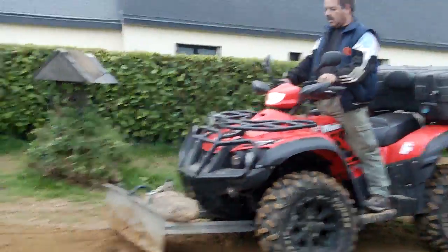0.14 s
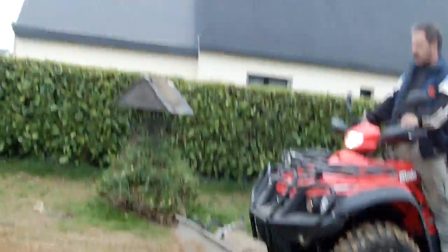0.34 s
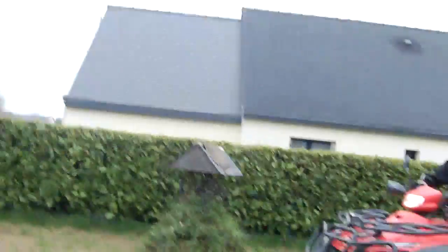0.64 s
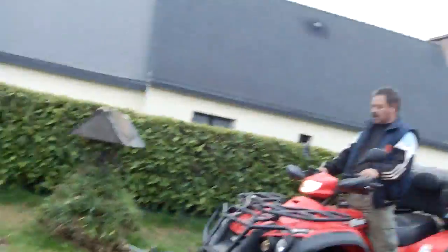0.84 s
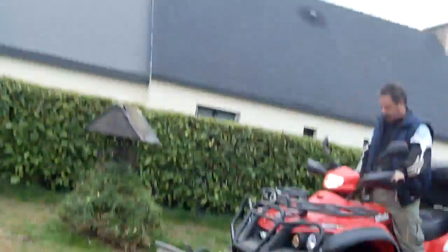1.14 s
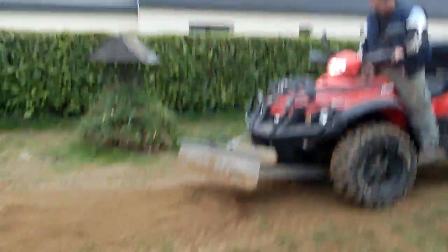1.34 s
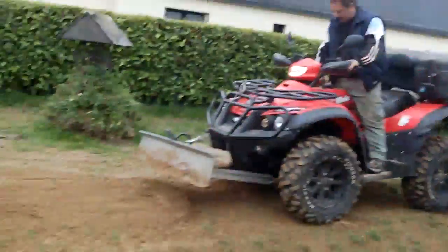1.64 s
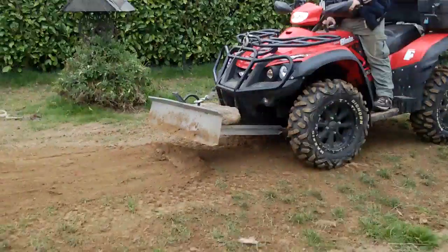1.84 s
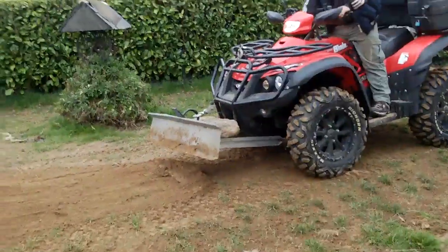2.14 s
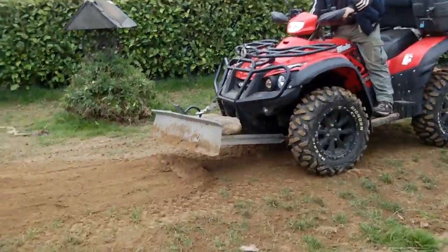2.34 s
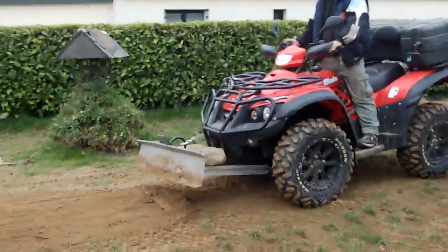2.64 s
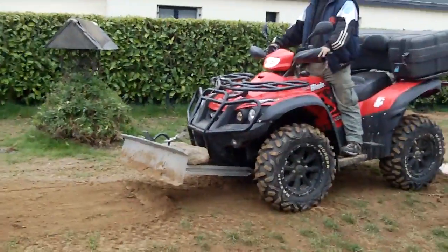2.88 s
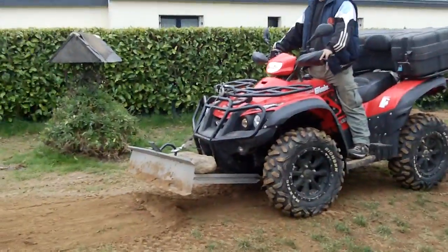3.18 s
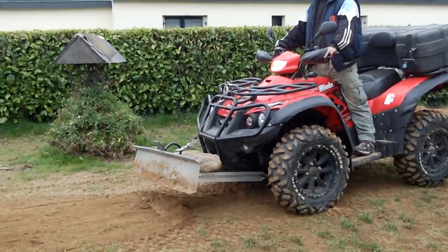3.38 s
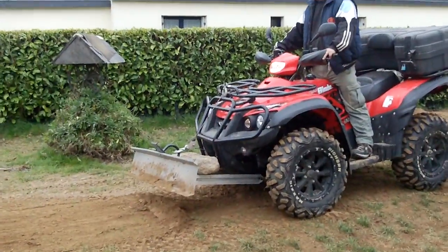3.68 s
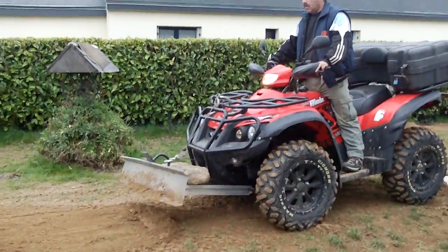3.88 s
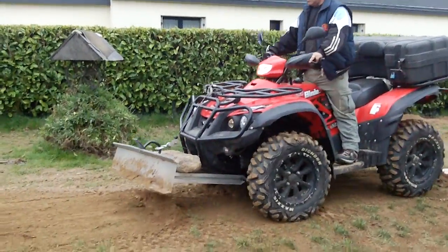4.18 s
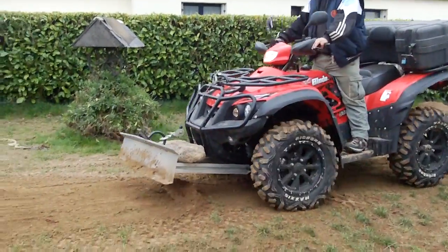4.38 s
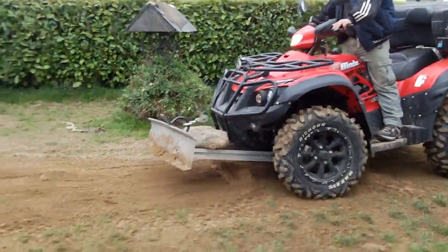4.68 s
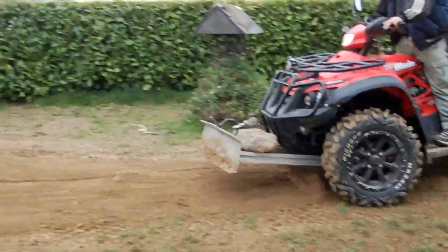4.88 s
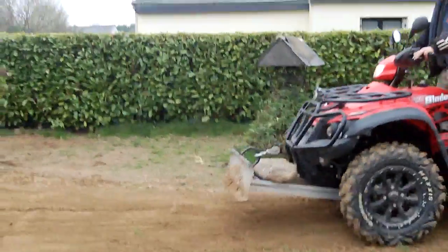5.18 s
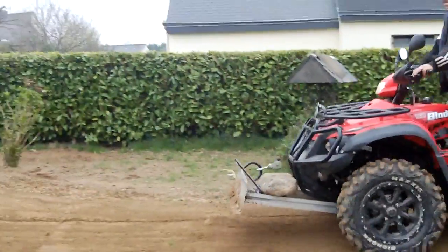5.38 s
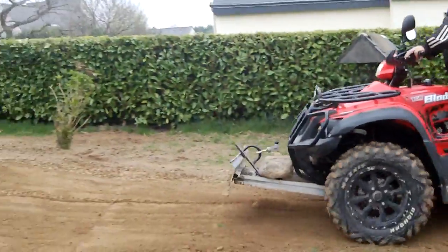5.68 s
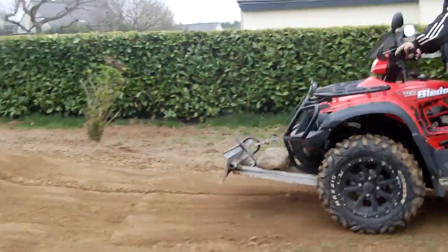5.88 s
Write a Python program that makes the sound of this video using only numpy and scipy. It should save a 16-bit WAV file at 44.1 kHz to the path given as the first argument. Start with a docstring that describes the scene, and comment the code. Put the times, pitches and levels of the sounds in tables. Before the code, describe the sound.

Outdoors, a single-cylinder quad engine putters at idle, briefly joined by a grainy hiss, then quickens into a throaty hum as it moves off. Very close handling noise keeps cutting in: dull thumps on the microphone and sharp knocks on its plastic casing, loudest near the middle and toward the end. A dull drone and an uneven low rumble lie behind.

```python
"""A single-cylinder quad chugs at idle in a garden, then pulls away; each firing rings silencer and pipe.
The microphone sits in a small handheld camera, so the handling is as close as can be:
pushes thump the microphone and knocks ring the plastic shell, clipping the input.
Engine clatter and a brighter hiss at the start come through the shell's treble resonances.
Behind them lie a dull drone, a low rumble and a thin whine."""
import sys
import numpy as np
from scipy import signal
from scipy.fft import rfft, irfft, next_fast_len
from scipy.io import wavfile
from scipy.ndimage import map_coordinates

SR = 44100
rng = np.random.default_rng(int(sys.argv[2]) if len(sys.argv) > 2 else 0)


def output_pcm(signal):
    """Save a mono or channel-first signal as 16-bit PCM at the path in sys.argv[1].

    Samples are clipped to [-1, 1] before scaling.
    """
    pcm = np.clip(np.atleast_2d(signal).T, -1, 1) * 32767
    wavfile.write(sys.argv[1], SR, np.round(pcm).astype(np.int16))


N = 265482

# engine speed: t/s, firing rate/Hz
FIRING_RATE = [(0.0, 12.277), (0.52, 12.084), (1.04, 12.56), (1.26, 12.38), (2.48, 13.745), (2.62, 12.483),
               (3.0, 13.735), (3.2, 12.384), (3.32, 16.587), (3.84, 20.691), (4.04, 24.347), (4.22, 21.954),
               (4.38, 23.051), (4.52, 19.741), (4.82, 19.842), (5.1, 23.644), (5.18, 22.737),
               (6.02, 25.413)]
# strength of a firing: t/s, silencer level/dB, tail pipe level/dB
FIRING_LEVELS = [(0.0, -14.5, -16.5), (0.5, -16, -17), (1.3, -16, -16), (2.0, -18, -15), (2.6, -16, -16.5),
                 (3.12, -23, -17.5), (3.38, -18, -13), (3.62, -12, -12.5), (3.98, -21.5, -13),
                 (4.3, -20, -11.5), (4.56, -18, -15), (4.72, -16.5, -14), (4.94, -13, -8.5),
                 (5.1, -15.5, -9.5), (5.3, -12.5, -11), (5.45, -40, -7), (5.7, -22, -7.5),
                 (5.88, -11.5, -8.5), (6.02, -17, -7)]
# exhaust modes: f/Hz, level/dB, t60/s
SILENCER_MODES = [(113, 3.5, 0.13)]
CHAMBER_MODES = [(60, -30, 0.081), (78, 4.5, 0.058)]
OUTLET_MODES = [(189.4, -10.5, 0.16), (222, -9, 0.053)]
PIPE_MODES = [(145.2, 0.5, 0.2)]
PIPE_SPEED_MODES = [(150.6, -13, 0.3), (271, -9, 0.077), (285, -24.5, 0.031)]
# pushes on the microphone: t/s, signed pressure/relative, rise/ms, swing f/Hz, t60/s
MIC_PUSHES = [(.385, 0.3, 5.9, 30, 0.088), (.692, 0.48, 6, 48, .08), (1.512, 0.07, 6, 33, 0.11),
              (1.595, 0.6, 3, 37, 0.066), (1.662, 0.4, 7.5, 21, 0.12), (1.721, -0.4, 2, 58, 0.06),
              (1.756, -0.4, 4.4, 36, 0.037), (1.868, 0.3, 7, 25, 0.067), (1.909, 0.35, 5, 19, 0.077),
              (1.998, 1.07, 4, 19.3, 0.13), (2.016, -.53, 5.1, 29, .071), (2.408, -1.25, 2.9, 56, 0.063),
              (2.418, 0.8, 3.6, 37.4, 0.32), (2.489, 0.35, 5, 44, .081), (2.678, 0.54, 8.5, 9.6, 0.22),
              (2.761, 1.58, 3.1, 62, .043), (2.767, -.95, 1, 11, 0.13), (2.947, 1.2, 1.4, 67, 0.025),
              (2.972, 0.3, 2.8, 26, 0.059), (3.236, -1.9, 1.84, 68, 0.011), (3.247, 0.37, 5, 14.6, .35),
              (3.458, 0.45, 8, 13, 0.091), (3.856, 1.09, 2.1, 17.4, .22), (3.909, 1.5, 1, 72, 0.026),
              (4.704, -2.3, 2.5, 94, 0.025), (4.712, 0.97, 2.6, 16, .13), (4.743, 0.85, 3.5, 16, 0.077),
              (4.823, 1.36, 2.3, 66, 0.062), (4.846, 0.46, 3.8, 19, .088), (5.72, -1.1, 8, 28, 0.052),
              (5.738, 0.75, 5.7, 10, .13), (5.939, 1.4, 9.8, 43, 0.055)]
# knocks on the camera: t/s, level/dB, tilt/dB per octave, ring length/ratio, favoured f/Hz
SHELL_KNOCKS = [(0.54, -29, 0, 1.24, 638), (0.736, -37, 9, .85, 1300), (1.02, -22, 2, 0.56, 605),
                (1.526, -34, 5, .7, 509), (1.599, -12.5, 5, 0.69, 947), (1.703, -23, -2, 0.62, 487),
                (1.905, -23.5, 0, 0.46, 690), (1.948, -21.5, -0.5, 0.76, 607), (1.985, -34, -4, .8, 460),
                (2.059, -35, 1, 1.25, 1300), (2.409, -17, 1, 1.07, 440), (2.479, -17, -0.5, 0.64, 1280),
                (2.761, .6, 1.5, 0.71, 870), (2.849, -29, -3.5, 1.06, 420), (2.945, -1.5, 0.5, 0.28, 1100),
                (2.967, -27.5, -2, 0.49, 500), (3.234, -28, -3, 0.81, 455), (3.47, -28.5, -5, .6, 804),
                (3.789, -32, -3, .45, 500), (3.851, -26, -5, .45, 452), (3.909, -5, 3.5, 0.34, 1270),
                (4.7, -27, -3, 0.63, 500), (4.737, -20, -4, 0.51, 821), (4.797, -32, -1, 1.2, 805),
                (4.823, 3.5, 2, 0.66, 594), (4.969, -34, 0, .45, 800), (5.073, -25.5, -1, .7, 786),
                (5.109, -28.5, -4.5, 1.5, 890), (5.523, -28, 3, 1.5, 810), (5.553, -26, 2, .8, 800),
                (5.716, -25.5, -1.5, 1.1, 746), (5.812, -19, -3, 1.06, 774), (5.834, -28.5, -2, 1.15, 756),
                (5.915, -22, -3, 1, 480), (5.925, -20, 0, 1.1, 750), (5.936, 3.6, 6.5, 0.38, 960)]
# modes of the plastic shell: f/Hz, level/dB, t60/s
SHELL_MODES = [(189.4, 1.5, 0.12), (322, -36, 0.0078), (397, -11, 0.15), (469, -2.5, 0.039),
               (561, 0.5, 0.033), (736, 1, 0.031), (931, -2, 0.042), (1277, 0.5, 0.044),
               (1650, -19.5, 0.042), (2325, -28, .015)]
# finger strokes on the shell: t/s, length/s, level/dB
FINGER_RUBS = [(.22, 0.065, -33.5), (.5, 0.19, -26), (1.711, 0.11, -28), (2.821, 0.086, -24.5),
               (5.512, 0.1, -21), (5.691, .07, -22), (5.827, 0.053, -17.5), (5.898, 0.075, -16)]
# ticks of grit: t/s, level/dB
GRIT_TICKS = [(0.2399, -10), (0.6, -12), (1.948, -29), (1.985, -28), (2.0644, -22), (2.9262, -18),
              (3.5648, -15), (5.0597, -14.5), (5.8095, -8), (5.8316, -11), (5.909, -14), (5.923, -10)]
# loudness of the noise layers: t/s, level/dB
CLATTER_LEVEL = [(0.68, -38), (1.7, -37.5), (2.05, -34.5), (2.25, -37), (2.9, -36), (3.15, -37.5),
                 (3.58, -33), (3.8, -34.5), (4.1, -31.5), (4.45, -31.5), (4.88, -34.5), (5.13, -31.5),
                 (5.45, -30.5), (6.02, -31)]
HISS_LEVEL = [(0, -27), (.25, -28), (.61, -26.5), (.63, -43), (.7, -90)]
RUMBLE_LEVEL = [(0, -23), (0.7, -22.5), (1.3, -25), (1.85, -16.5), (2.25, -26.5), (2.6, -20.5),
                (3.3, -20.5), (3.6, -40), (3.9, -19), (4.2, -36), (4.95, -20.5), (5.3, -21.5), (5.6, -43),
                (6.02, -16.5)]
# colour of the noise layers: f/Hz, relative level/dB
CLATTER_SPECTRUM = [(1120, -46), (1900, -15.5), (2440, -11), (2620, -5), (3050, 1), (3330, -4.5),
                    (4050, -10), (4470, -10.5), (5490, -14.5), (6920, -8), (7770, -15.5), (8620, -25),
                    (9130, -19), (12800, -34.5), (16000, -38)]
HISS_SPECTRUM = [(1180, -54), (2000, -20), (3200, 1), (3520, -4), (3810, -5), (4340, -9.5), (5030, -12.5),
                 (5440, -6.5), (6940, 1), (8550, -17.5), (9330, -11), (11500, -25), (12700, -33),
                 (15100, -33), (16000, -38)]
DRONE_SPECTRUM = [(180, -36), (300, 3), (371, -11), (411, -8), (564, -4.5), (668, -7.5), (908, -3.5),
                  (1010, -11.5), (1220, -7.5), (1480, -11.5), (2300, -18), (2990, -49), (5060, -120)]
RUMBLE_SPECTRUM = [(6, -51), (14, 18.5), (30, -4), (60, 0), (200, -13.5), (400, -63)]
GAS_SPECTRUM = [(90, -30), (170, 0), (230, -6), (330, -24), (500, -40)]
MIC_SPECTRUM = [(5000, -17), (12000, 1), (16000, 0), (17000, -10)]
# clatter bands that flutter separately: low f/Hz, high f/Hz
FLUTTER_BANDS = [(0, 4200), (4200, 8500), (8500, 12000), (12000, 20000)]


def exhaust(rate, cycles):
    """One firing per four-stroke cycle rings silencer and pipe; the unbalanced crank shakes twice."""
    firings = np.diff(np.floor(cycles), prepend=0) * amp(0.24 * wobble(13))
    silencer_db, pipe_db = curves(FIRING_LEVELS)
    silencer_pulses, pipe_pulses = firings * amp(silencer_db), firings * amp(pipe_db)
    t = np.arange(SR // 2) / SR
    # the silencer first sucks in, its outlet and the pipe push out
    chug = -excite(silencer_pulses, ring(SILENCER_MODES, t, 0.00052))
    # a short swell of pressure runs ahead of each firing
    lead = round(0.0068 * SR)
    chug += np.convolve(silencer_pulses * amp(-8), np.hanning(lead))[lead - 1:]
    # the big chamber and the outlet speak mostly at idle
    idle_pulses = silencer_pulses * amp(-.6 * np.clip(rate - 17, 0, 9))
    chug += excite(idle_pulses, ring(OUTLET_MODES, t, 0.0006) - ring(CHAMBER_MODES, t, 0.00032))
    boom = excite(pipe_pulses, ring(PIPE_MODES, t, 0.00065))
    # at speed the pipe rings longer and its overtones build up
    hum = excite(pipe_pulses * np.clip(rate / 21, 0, 1) ** 3.1, ring(PIPE_SPEED_MODES, t, 0.003))
    shake = amp(pipe_db - 15) * (rate / 23) ** 2 * np.cos(4 * np.pi * cycles)
    # turbulent gas puffs out after each firing
    puffs = excite(pipe_pulses, t / 0.0033 * np.exp(-t / 0.0084))
    gas = amp(-24) * puffs * coloured(GAS_SPECTRUM, noise())
    # the silencer swallows everything above its chambers' range
    return filtered(chug + boom + hum + shake + gas, lambda hz: 1 / (1 + (hz / 330) ** 8))


def clatter(cycles):
    """Valve gear and cooling air: fluttering noise with four tappet strikes and one swell per cycle."""
    air = np.zeros(N)
    for low, high in FLUTTER_BANDS:
        flutter = amp(.4 * wobble(9) + .7 * wobble(45))
        air += flutter * filtered(grainy_noise(1.1), lambda hz: (hz >= low) & (hz < high))
    level_db, = curves(CLATTER_LEVEL)
    tappets_db = .5 * np.cos(8 * np.pi * cycles)
    throb_db = .67 * np.cos(2 * np.pi * cycles - .7)
    return amp(level_db + tappets_db + throb_db) * coloured(CLATTER_SPECTRUM, air)


def pushes():
    """Pressure right on the microphone builds to a cusp, then swings back and dies."""
    t, thumps = np.arange(N) / SR, np.zeros(N)
    for at, pressure, rise_ms, swing_hz, t60 in MIC_PUSHES:
        rise = rise_ms / 1000
        near = slice(max(round((at - 8 * rise) * SR), 0), round((at + t60) * SR))
        age = t[near] - at
        swing = amp(-60 * age / t60) * np.cos(2 * np.pi * swing_hz * age)
        thumps[near] += pressure * np.where(age < 0, np.exp(age / rise), swing)
    return filtered(thumps, lambda hz: 1 / (1 + (hz / 260) ** 2))


def knocks():
    """Each knock rings the shell around the microphone, with a short crack and a dull scuff."""
    rings, scuffs, cracks = np.zeros((3, N))
    t = np.arange(SR // 5) / SR
    for at, db, tilt_db, ring_length, spot_hz in SHELL_KNOCKS:
        modes = []
        for hz, mode_db, t60 in SHELL_MODES:
            detune, scatter_db = noise(2) * [.015, 2]
            # where the knock lands favours the modes near one pitch
            spot_db = 7 * np.exp(-(np.log(hz / spot_hz) / 0.2) ** 2)
            mode_db += tilt_db * np.log2(hz / 800) + scatter_db + spot_db
            modes.append((hz * (1 + detune), mode_db, t60 * ring_length))
        rattle = 1 + 0.17 * noise(len(t))
        crack_db = 1.35 * db - 7.5  # hard blows crack far more than soft ones
        add(cracks, at + 0.00093, amp(crack_db - 60 * t / 0.0065) * noise(len(t)))
        add(rings, at + 0.00042, amp(db - 2.5) * ring(modes, t, 0.00059) * rattle)
        add(scuffs, at + .0005, amp(db + 5 - 60 * t / (.025 * ring_length)) * noise(len(t)))
    rings = filtered(rings, lambda hz: 1 / (1 + 1j * hz / 1900) ** 3)
    cracks = filtered(cracks, lambda hz: 1 / (1 + 1j * hz / 4000))
    return rings + cracks + filtered(scuffs, scuff_response)


def rubs():
    """Fingers rub the shell in short swells of dull noise."""
    strokes = np.zeros(N)
    for at, length, db in FINGER_RUBS:
        swell = np.hanning(round(length * SR))
        add(strokes, at, amp(db) * swell * noise(len(swell)))
    return filtered(strokes, scuff_response)


def ticks():
    """Grit ticks: tiny noise bursts through two treble resonances."""
    t, bursts = np.arange(SR // 5) / SR, np.zeros(N)
    for at, db in GRIT_TICKS:
        add(bursts, at, amp(db - 60 * t / 0.015) * (1 - np.exp(-t / 0.0009)) * noise(len(t)))
    return 1.68 * filtered(bursts, lambda hz: resonance(hz, 6700, 2600) ** 2 - .7 * resonance(hz, 3050, 700))


def hiss():
    """A bright, grainy hiss that drops away within the first second."""
    level_db, = curves(HISS_LEVEL)
    return amp(level_db + wobble(29.3)) * coloured(HISS_SPECTRUM, grainy_noise(1.1))


def drone(rate, idle_hz=12.5):
    """A dull midrange noise that grows with engine speed."""
    level_db = -45.5 + .5 * (rate - idle_hz)
    return amp(level_db + 1.3 * wobble(12)) * coloured(DRONE_SPECTRUM, grainy_noise(0.87))


def rumble():
    """Deep noise heaves unevenly under everything."""
    level_db, = curves(RUMBLE_LEVEL)
    return amp(level_db + 2.5 * wobble(6.3)) * coloured(RUMBLE_SPECTRUM, noise())


def noise_floor(whine_hz=11988):
    """A thin, nearly steady whine and the microphone's own noise."""
    phase = 2 * np.pi * np.cumsum(whine_hz + 4 * wobble(22.7)) / SR
    return np.sqrt(2) * amp(-73) * np.sin(phase) + amp(-64) * coloured(MIC_SPECTRUM, noise())


def amp(db):
    return 10 ** (np.asarray(db) / 20)


def curves(rows):
    """One value per sample for each column after the time."""
    times, *columns = np.transpose(rows)
    return [np.interp(np.arange(N) / SR, times, column) for column in columns]


def noise(count=N):
    return rng.standard_normal(count)


def wobble(rate):
    """A smooth random curve, rate knots a second."""
    return map_coordinates(noise(int(N * rate / SR) + 4), [np.arange(N) * rate / SR])


def grainy_noise(spread_db):
    """Noise whose level flickers fast."""
    return noise() * amp(spread_db * wobble(400))


def filtered(x, response):
    """x through a frequency response."""
    size = next_fast_len(N + SR // 2)
    return irfft(rfft(x, size) * response(np.fft.rfftfreq(size, 1 / SR)), size)[..., :N]


def coloured(spectrum, source):
    """The source shaped by a spectrum table, rms 1."""
    points_hz, db = np.transpose(spectrum)
    x = filtered(source, lambda hz: amp(np.interp(np.log(hz + 1), np.log(points_hz), db, -120, -120)))
    return x / np.std(x)


def resonance(hz, centre_hz, width_hz):
    """Band-pass response of one mode."""
    return 1j * hz * width_hz / (centre_hz ** 2 - hz ** 2 + 1j * hz * width_hz)


def scuff_response(hz):
    """The broad, dull band of a scuff on the shell."""
    return resonance(hz, 650, 1300) ** 2 / (1 + (hz / 1600) ** 6)


def ring(modes, t, attack_s):
    """Damped sines with a soft start."""
    sines = sum(amp(db - 60 * t / t60) * np.sin(2 * np.pi * hz * t) for hz, db, t60 in modes)
    return (1 - np.exp(-t / attack_s)) * sines


def excite(pulses, response):
    """Each pulse sets off the response."""
    return signal.fftconvolve(pulses, response)[:N]


def add(track, at, sound):
    """Mix a sound into the track at a time in seconds."""
    part = track[round(at * SR):][:len(sound)]
    part += sound[:len(part)]


def scene():
    """Quad, handling and background at the one microphone."""
    rate, = curves(FIRING_RATE)
    cycles = .397 + np.cumsum(rate) / SR
    quad = exhaust(rate, cycles) + clatter(cycles)
    background = drone(rate) + rumble() + hiss() + noise_floor()
    handling = pushes() + knocks() + rubs() + ticks()
    return (quad + handling + background)[None]


def record(dry, top_hz=16000):
    """The camera's input clips, a coupling capacitor lets the flat tops sag, and the band ends steeply."""
    clipped = dry / (1 + np.abs(dry / .95) ** 24) ** (1 / 24)
    sagged = filtered(clipped, lambda hz: 1j * hz / (9 + 1j * hz))
    return np.clip(filtered(sagged, lambda hz: hz < top_hz), -1, 1)


dry = scene()
out = record(dry)
output_pcm(out)
```